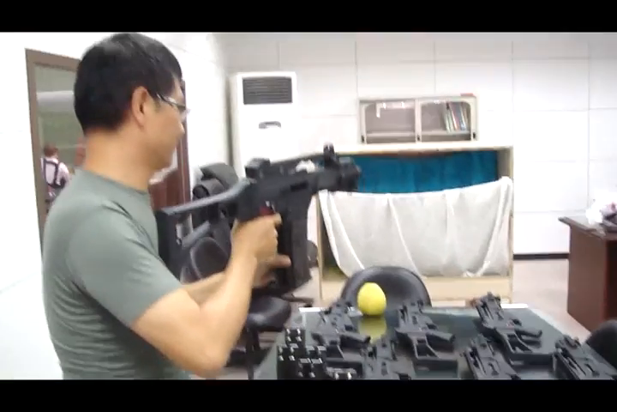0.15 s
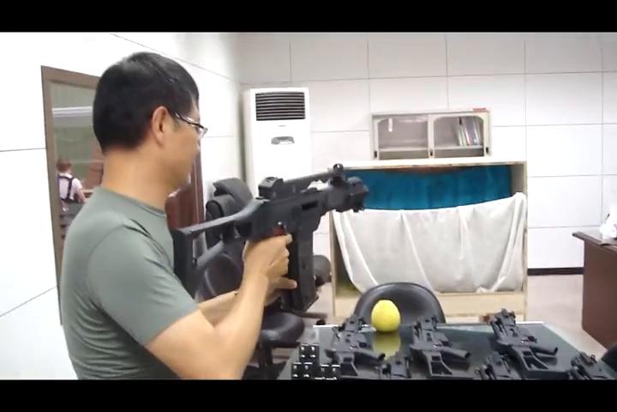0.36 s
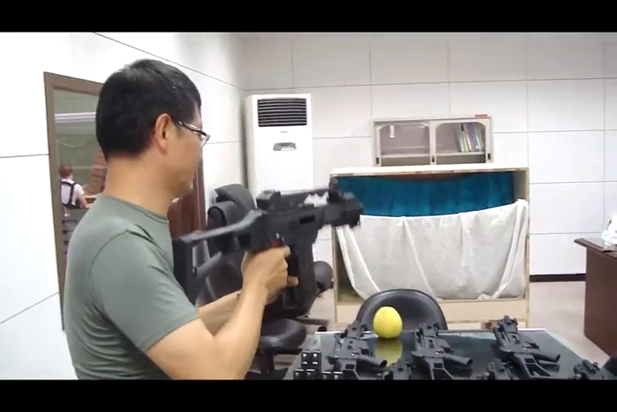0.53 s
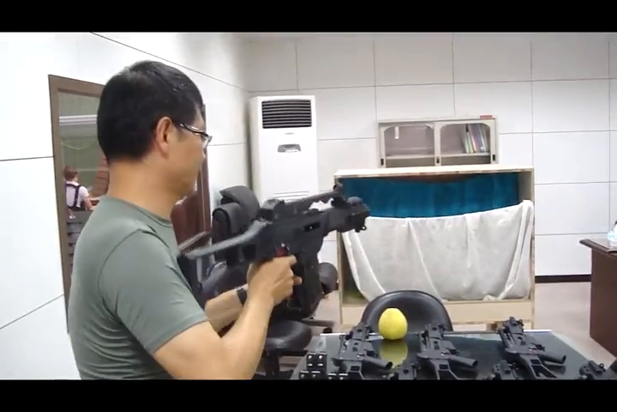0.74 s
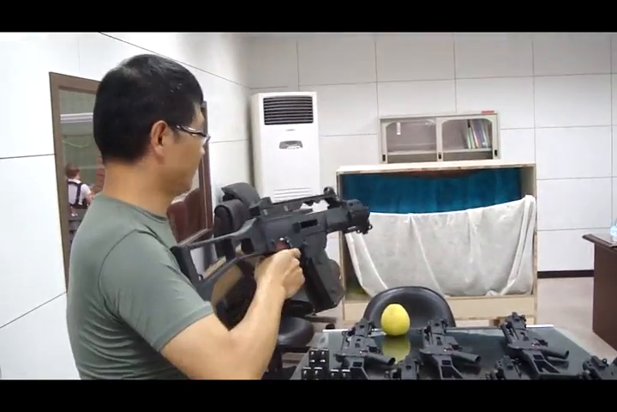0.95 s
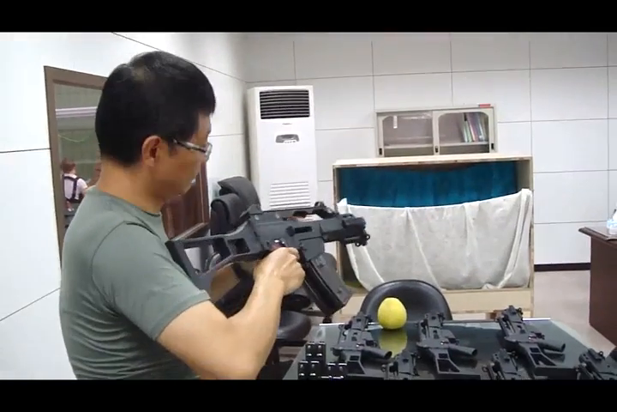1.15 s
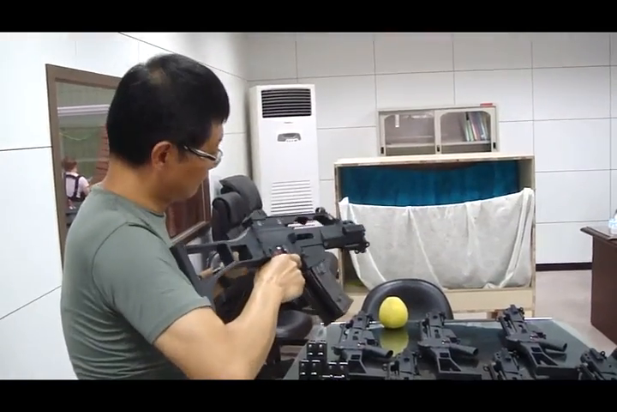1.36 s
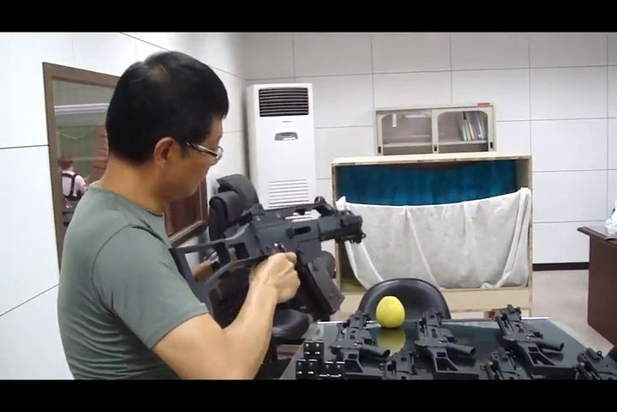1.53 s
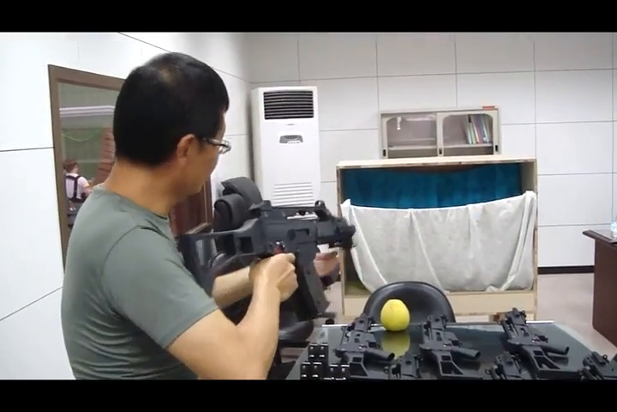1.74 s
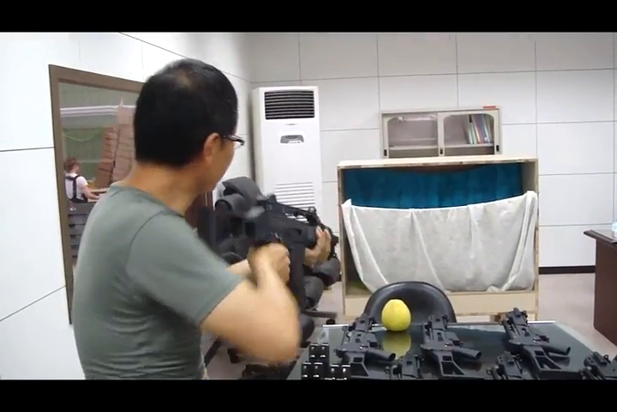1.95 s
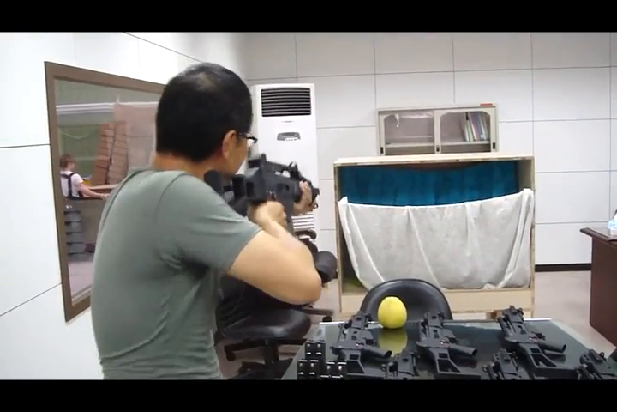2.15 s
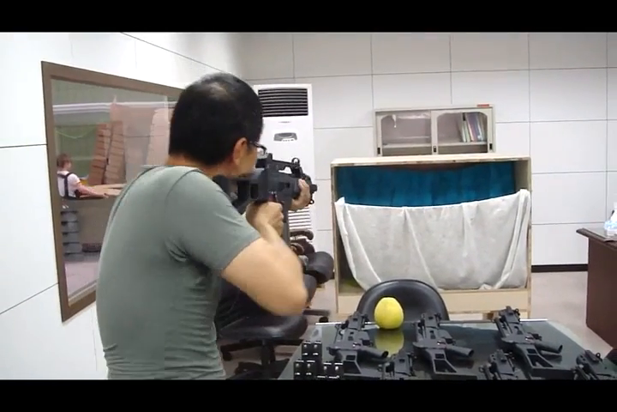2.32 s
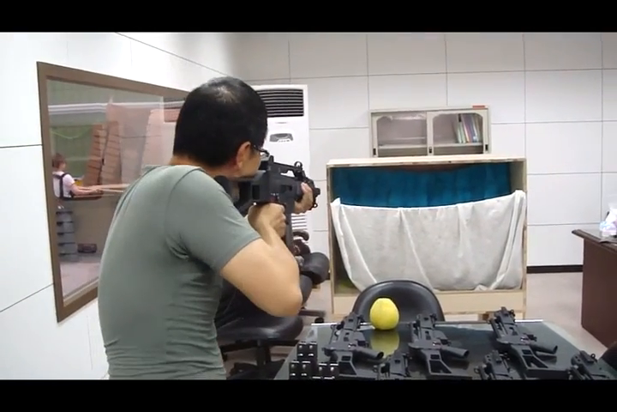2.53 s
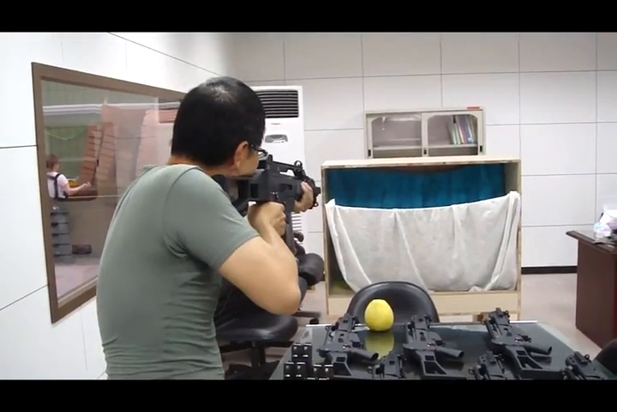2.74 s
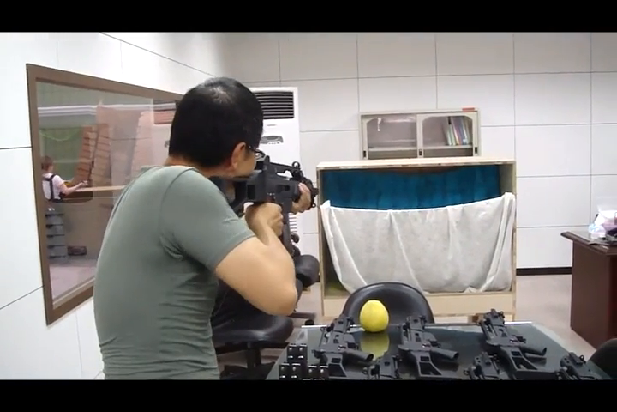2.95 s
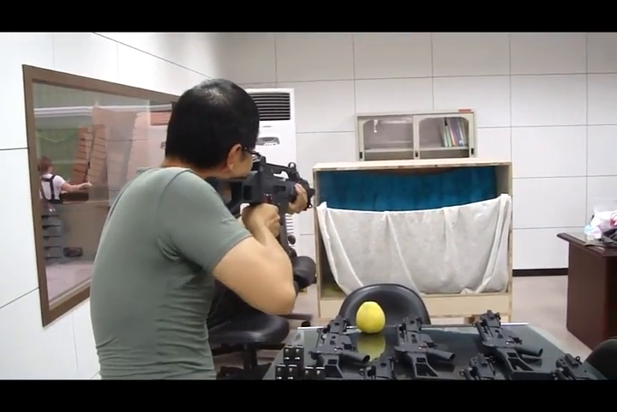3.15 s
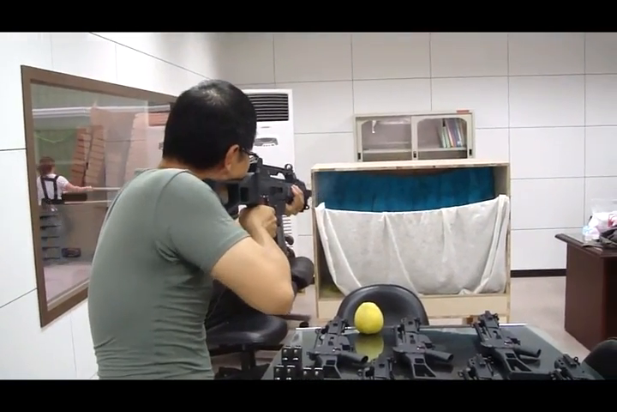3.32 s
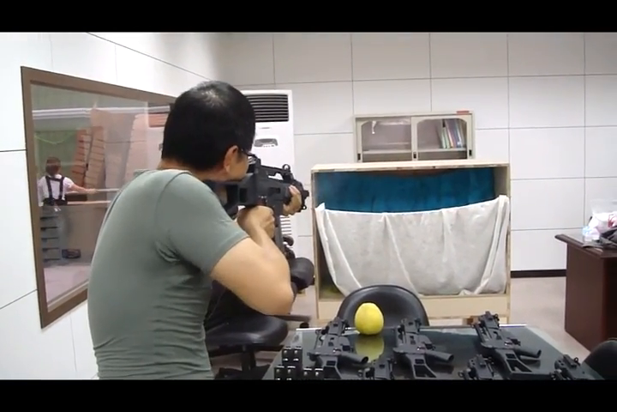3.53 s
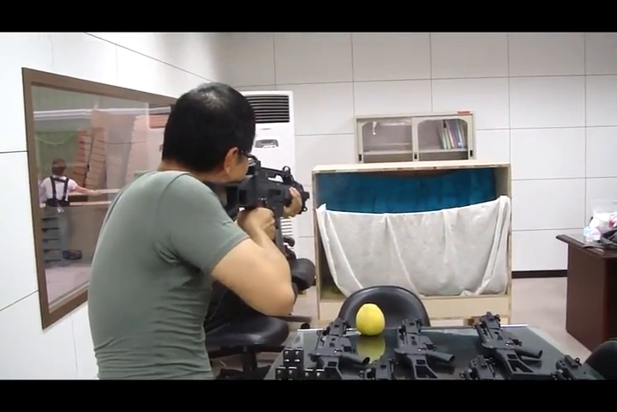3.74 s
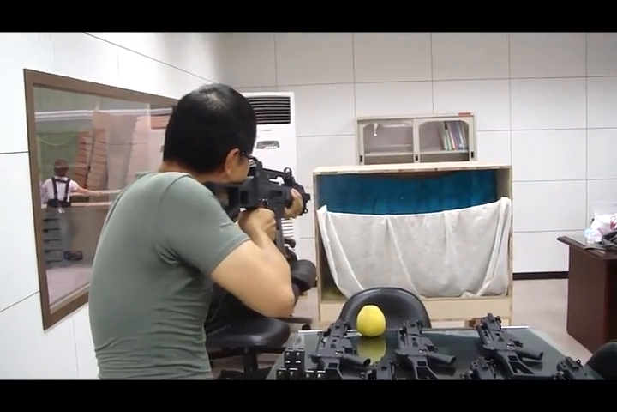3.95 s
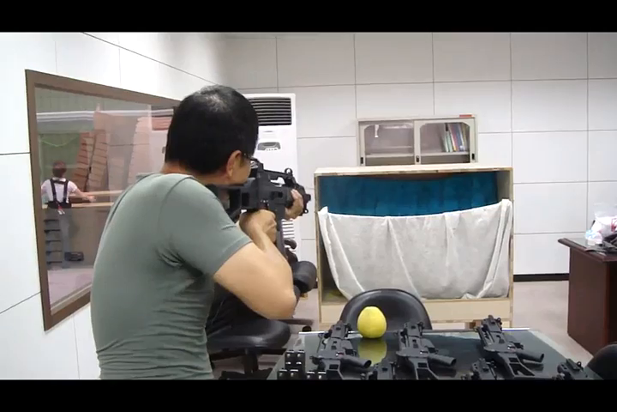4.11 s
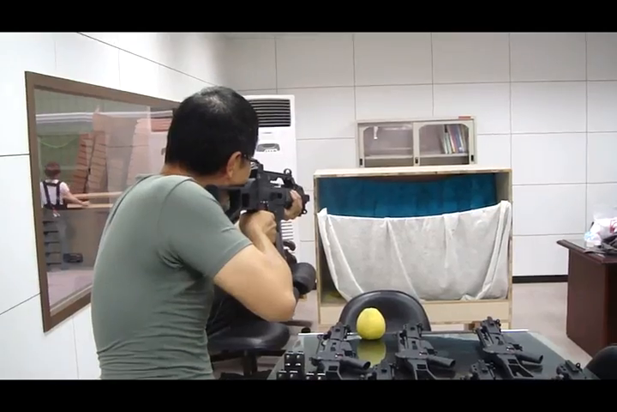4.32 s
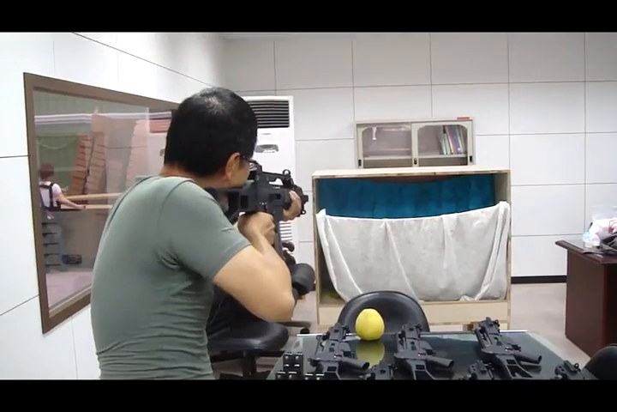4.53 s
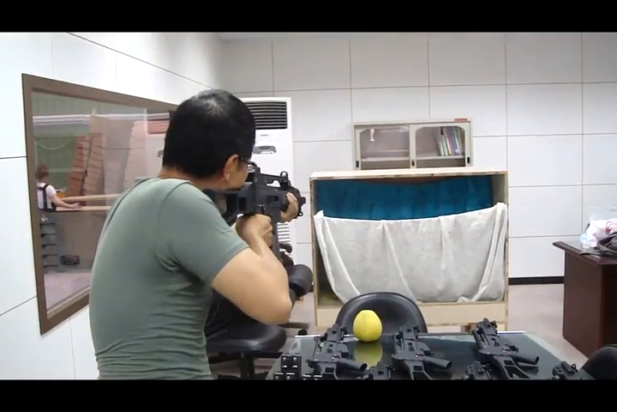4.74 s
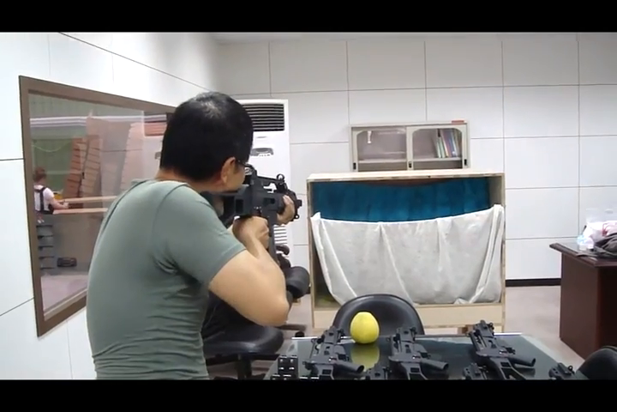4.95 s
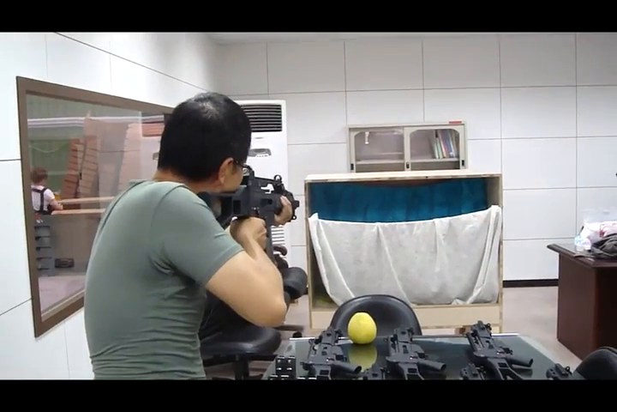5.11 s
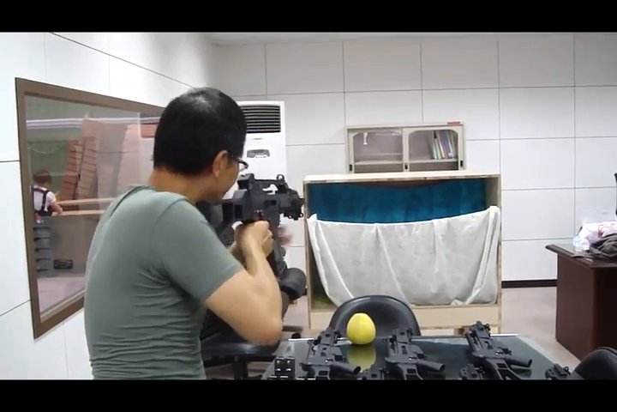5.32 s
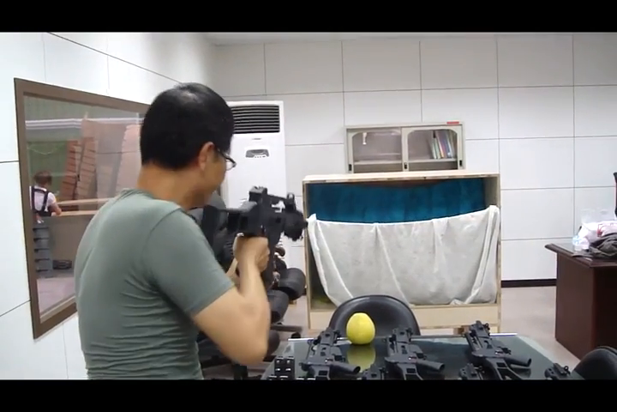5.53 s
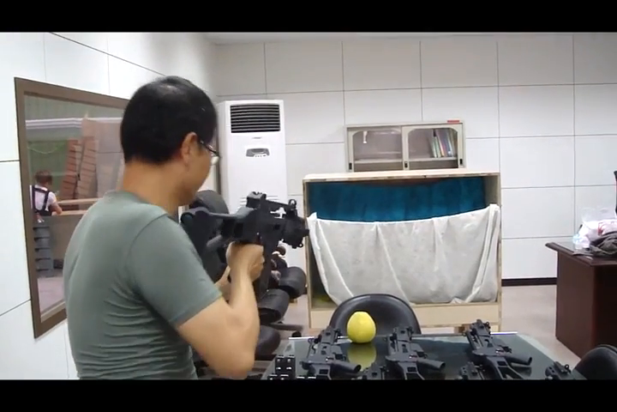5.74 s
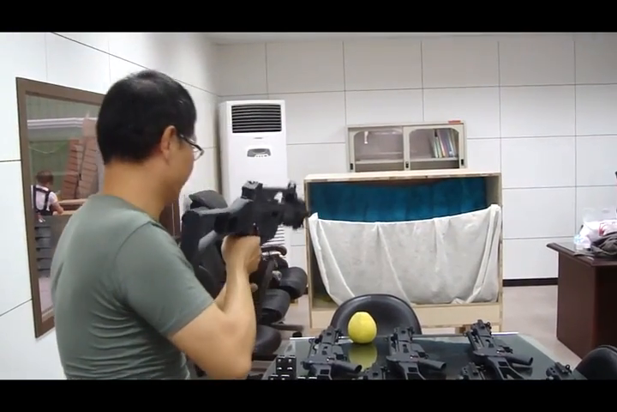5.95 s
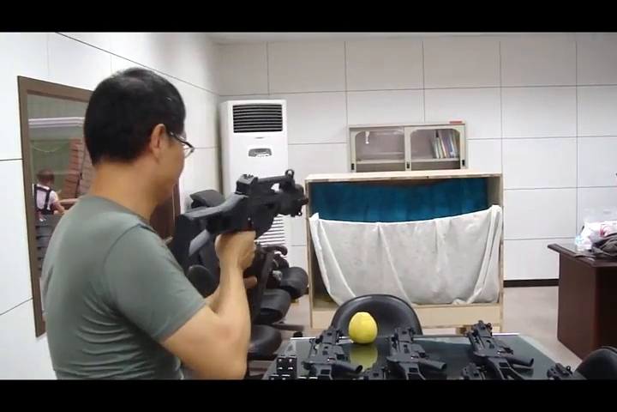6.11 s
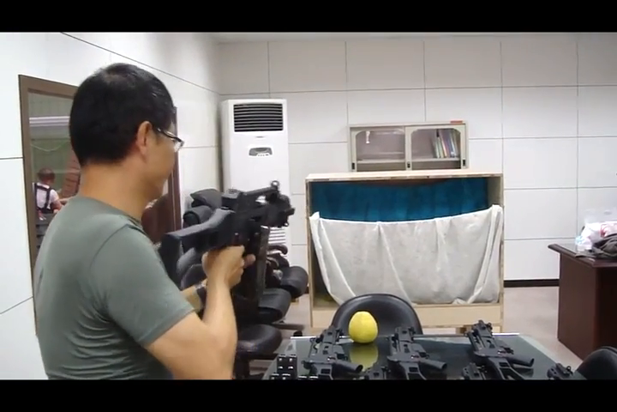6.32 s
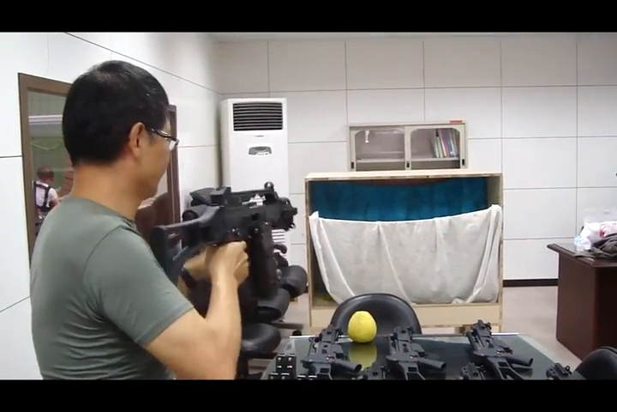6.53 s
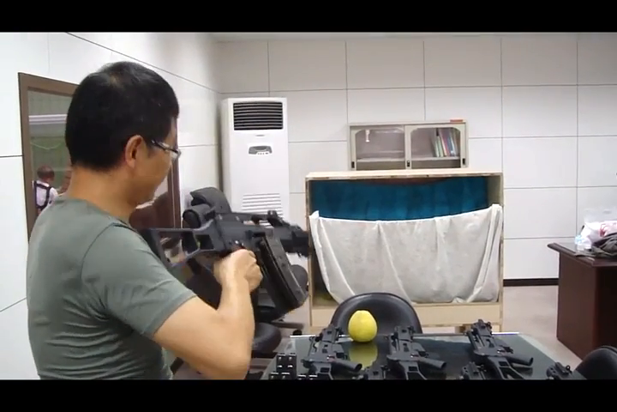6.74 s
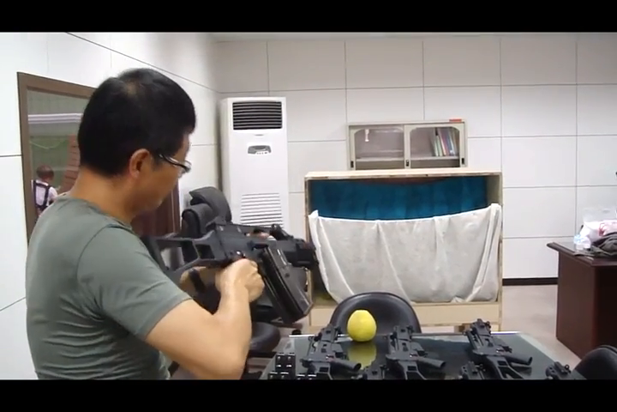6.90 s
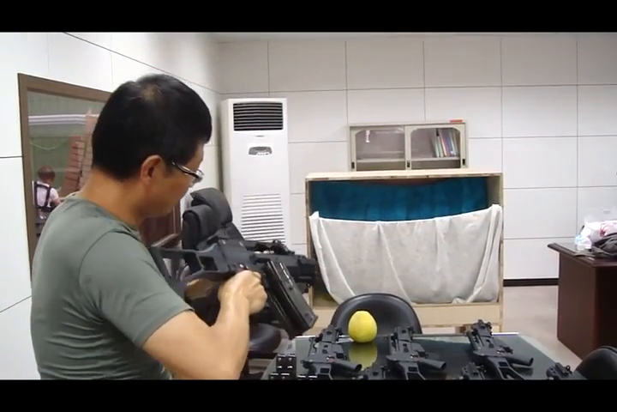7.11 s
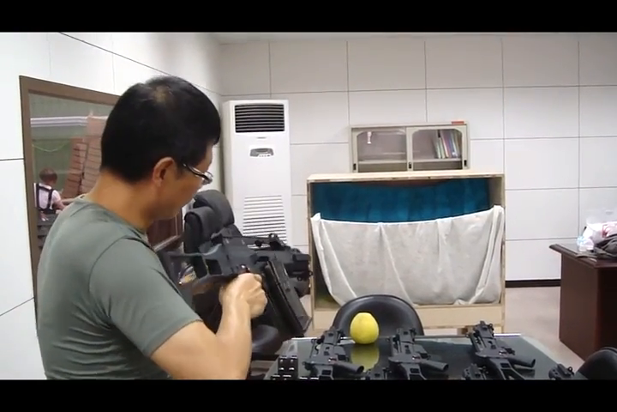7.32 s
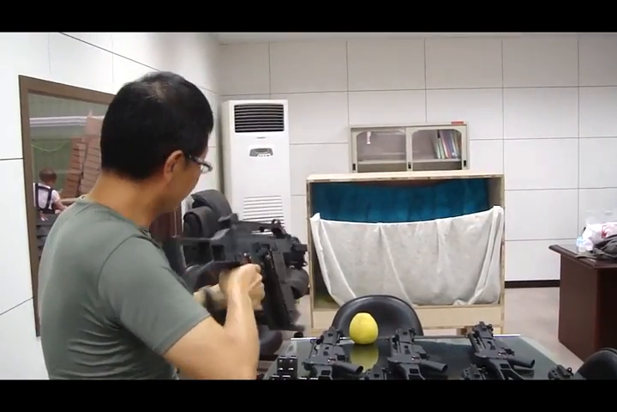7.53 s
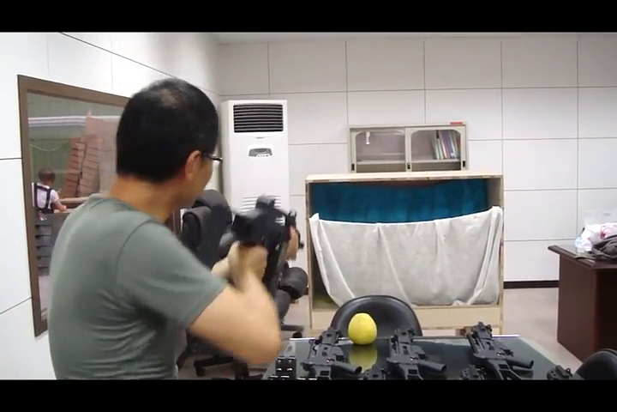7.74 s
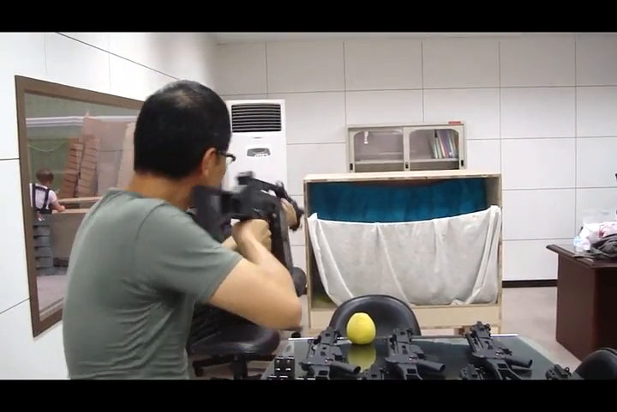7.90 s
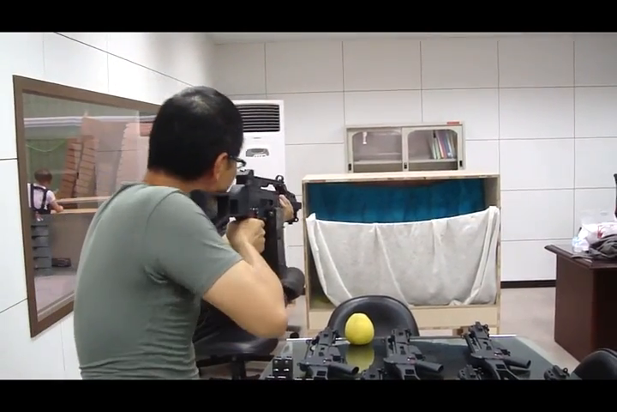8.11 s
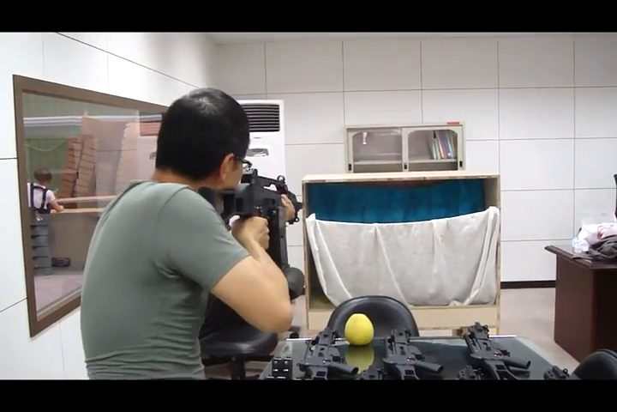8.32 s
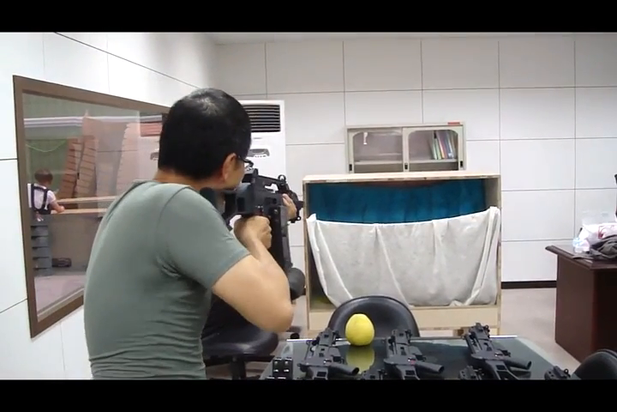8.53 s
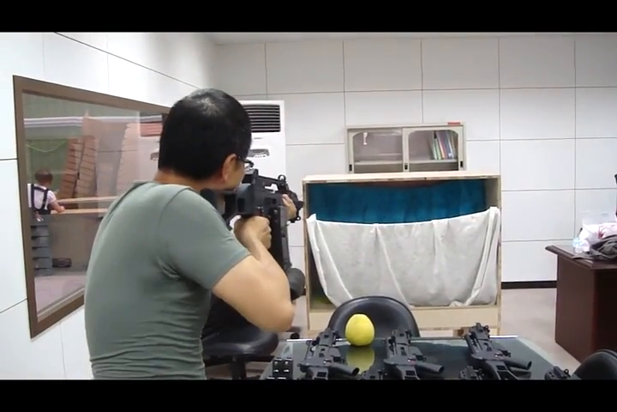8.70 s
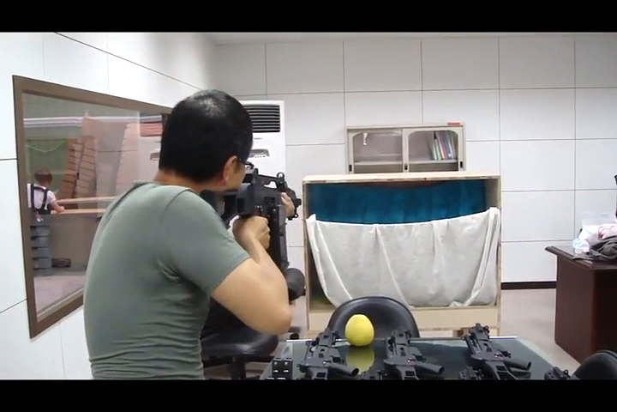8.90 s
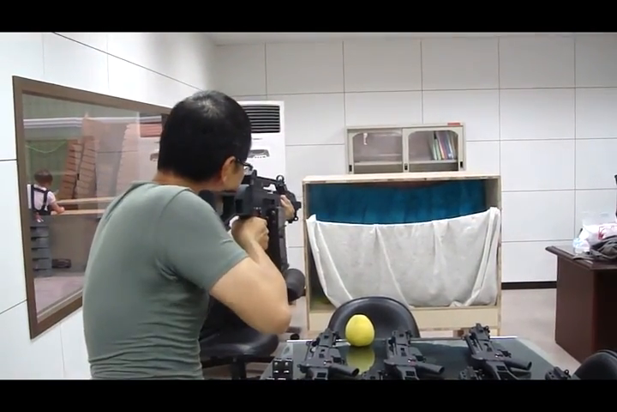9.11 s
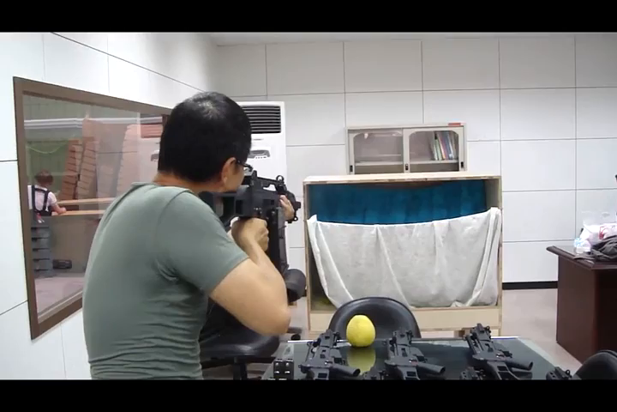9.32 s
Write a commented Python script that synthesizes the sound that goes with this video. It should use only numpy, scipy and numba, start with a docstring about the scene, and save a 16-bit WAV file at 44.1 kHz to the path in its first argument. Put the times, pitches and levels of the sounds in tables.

```python
"""A gas blowback airsoft rifle in a hard-walled room with a steady ventilation rush.
Hands bump the magazine and latch it, the bolt slams home, and a full-auto burst of gas pops and bolt
clacks follows, slowing and weakening as the gas cools. The magazine is latched again, the bolt slams
and a shorter burst fires at an even rate. Throughout, a gain control flattens every loud blow and
lets the room's ring swell up behind it."""
import sys
import numpy as np
from scipy import signal
from scipy.fft import rfft, irfft
from scipy.io import wavfile
from numba import njit

SR = 44100
rng = np.random.default_rng(int(sys.argv[2]) if len(sys.argv) > 2 else 0)


def transcribe(u):
    """Save the signal u as a 16-bit wav file named by the first command-line argument.

    u: samples, shape (n,) or (channels, n), limited to [-1, 1]; the rate is SR.
    q: integer samples, one column per channel.
    """
    v = np.clip(np.atleast_2d(u).T, -1, 1)
    q = np.round(v * 32767).astype(np.int16)
    wavfile.write(sys.argv[1], SR, q)


N = 412776


def amp(db):
    """Decibels to gain."""
    return 10 ** (np.asarray(db) / 20)


def unit_energy(x):
    """Scale so that the squares sum to one."""
    return x / np.sqrt(np.sum(x ** 2) + 1e-20)


def at_hz(points, hz):
    """Read a table on a log-frequency axis."""
    table_hz, values = np.transpose(points)
    return np.interp(np.log(np.maximum(hz, 1)), np.log(table_hz), values)


def convolve(x, response):
    """Play x through an impulse response."""
    return signal.fftconvolve(x, response)[:len(x)]


def colour(spectrum, size=8192):
    """Minimum-phase impulse response with the given spectrum."""
    gain = amp(at_hz(spectrum, np.fft.rfftfreq(size, 1 / SR)))
    cepstrum = irfft(np.log(gain))
    cepstrum[1:size // 2] *= 2
    cepstrum[size // 2 + 1:] = 0
    return irfft(np.exp(rfft(cepstrum)))


def body(spectrum, modes):
    """Impulse response of a part: a broad crack with resonances ringing out of it."""
    crack, rings = colour(spectrum), 0
    for hz, width_hz, db in modes:
        r = np.exp(-np.pi * width_hz / SR)
        poles = [1, -2 * r * np.cos(2 * np.pi * hz / SR), r * r]
        rings = rings + amp(db) * (1 - r * r) / 2 * signal.lfilter([1, 0, -1], poles, crack)
    return unit_energy(crack + rings)


def blows(rows, rise, size=8192):
    """Each contact or puff is a rough, broadband force; it swells over `rise` of its length, then dies."""
    force, t = np.zeros(N + 2 * size), np.arange(size) / SR
    for (s, db, length_s), grit in zip(rows, rng.standard_normal((len(rows), size))):
        decay, start = np.exp(-t / length_s), int(s * SR)
        swell = (1 - np.exp(-t / (rise * length_s))) ** 2
        whitened = irfft(np.exp(1j * np.angle(rfft(grit * decay * swell))))
        pulse = unit_energy(whitened * np.sqrt(swell * np.sqrt(decay)))
        force[start:start + size] += amp(db) * np.linalg.norm(decay) * pulse
    return force[:N]


def pattern(events, contacts):
    """Repeat a run of contacts at every event (s, force dB)."""
    return [(s + delay_s, force_db + db, length_s)
            for s, force_db in events for delay_s, db, length_s in contacts]


# Air spectrum. Each row: frequency in Hz, relative level in dB.
VENT_SPECTRUM = [(15, -65), (25, -27), (92, -21.5), (160, -7.5), (260, -5), (353, -1), (444, -9), (492, -5),
                 (559, -5), (703, -3), (884, -4.5), (1230, -8.5), (2100, -12), (3320, -21.5),
                 (11000, -37.5), (14300, -68), (22000, -120)]

def ventilation(rms_db=-36.5):
    """Steady rush of moving air."""
    return amp(rms_db) * convolve(rng.standard_normal(N), unit_energy(colour(VENT_SPECTRUM)))


# Spectra of the struck parts. Each row: frequency in Hz, relative level in dB.
RECEIVER_SPECTRUM = [(40, -27), (120, -29), (300, -14), (550, -8), (800, -0.5), (1300, 4), (2400, 3),
                     (4000, -4), (5300, -7), (8000, -17.5), (11000, -23.5)]
MAGAZINE_SPECTRUM = [(40, -27), (150, -36), (350, -16), (550, 1.5), (800, -0.5), (1150, 2.5), (1500, -5.5),
                     (2500, -7.5), (5000, -14.5), (11000, -30)]
CATCH_SPECTRUM = [(100, -17), (800, 0), (2000, 12.5), (4500, 11.5), (7000, 7), (11000, 0.5)]
BUFFER_SPECTRUM = [(60, -28), (300, -19), (700, -2), (1800, -0.5), (3000, -1), (4200, -1), (7000, -8.5),
                   (11000, -18.5)]
# Their resonances. Each row: frequency in Hz, width in Hz, gain in dB.
RECEIVER_MODES = [(580, 160, 2.5), (1064, 12, 9.5), (1175, 77, -2.5), (1590, 51, -13), (2260, 160, -16)]
MAGAZINE_MODES = [(1020, 120, 2), (1104, 38, 4.2), (1190, 57, 3.7)]
CATCH_MODES = [(1990, 35, 8), (3623, 120, 3), (4155, 79, 8.5), (4210, 74, 6.5), (5740, 60, -5)]
BUFFER_MODES = [(2950, 510, 0.9), (3290, 35, 1.3)]
# Handling bumps. Each row: start in seconds, receiver in dB, magazine in dB, length in seconds.
BUMPS = [(.370, -21, -24, 0.0068), (0.503, -25, -26, 0.0047), (0.521, -20.5, -19, 0.0048),
         (0.555, -15, -24, 0.0056), (0.563, -12, -17, 0.0056), (1.358, -19, -8.5, 0.0034),
         (5.421, -21.5, -22, 0.0081), (5.822, -20.5, -24, 0.012), (5.882, -37, -22.5, 0.0085),
         (6.21, -12, -4, 0.0067), (6.222, -1, -3, 0.0056), (6.695, -27, -31, .006),
         (7.139, -29, -20, 0.0063)]
# Catch clicks and pushes that seat the magazine. Each row: time in seconds, force in dB.
CLICKS = [(0.368, -25), (1.227, -23), (1.269, -11), (1.339, -20.5), (7.041, -18.5), (7.062, -11.5),
          (7.111, -14.5)]
SEATINGS = [(.590, -1), (6.302, 2)]
# The magazine meets the catch, then its stop.
# Each row: offset from the stop in seconds, relative level in dB, length in seconds.
SEAT_RECEIVER = [(-.009, -2.5, 0.0016), (0, 7.5, 0.0036)]
SEAT_MAGAZINE = [(-.009, -14, 0.0069), (0, 2, 0.0017)]
SEAT_BUFFER = [(0.0014, -6.5, 0.0029)]

def magazine_handling(click_s=0.0031):
    """Hands knock the receiver, steel catches click, and the hollow magazine clunks home."""
    knocks = [(s, db, length_s) for s, db, _, length_s in BUMPS] + pattern(SEATINGS, SEAT_RECEIVER)
    clunks = [(s, db, length_s) for s, _, db, length_s in BUMPS] + pattern(SEATINGS, SEAT_MAGAZINE)
    clicks = [(s, db, click_s) for s, db in CLICKS]
    jolts = pattern(SEATINGS, SEAT_BUFFER)
    return (convolve(blows(knocks, rise=0.66), body(RECEIVER_SPECTRUM, RECEIVER_MODES))
            + convolve(blows(clunks, rise=0.83), body(MAGAZINE_SPECTRUM, MAGAZINE_MODES))
            + convolve(blows(clicks, rise=0.38), body(CATCH_SPECTRUM, CATCH_MODES))
            + convolve(blows(jolts, rise=0.68), body(BUFFER_SPECTRUM, BUFFER_MODES)))


# Bolt releases. Each row: slam time in seconds, slam force in dB, run-up force in dB.
RELEASES = [(1.648, -0.5, -12.5), (7.478, -0.5, -3)]
# Run-up and slam contacts.
# Each row: offset from the slam in seconds, relative level in dB, length in seconds.
RUN_MAGAZINE = [(-.024, -7.5, 0.004), (-.013, -1.5, 0.007)]
RUN_STEEL = [(-.019, -18, 0.0095), (-.012, -1, .0016)]
RUN_BUFFER = [(-0.0086, -2.4, .003)]
SLAM_STEEL = [(0.00098, 1.8, 0.00073)]
SLAM_RECEIVER = [(0.0013, 1.3, 0.003)]
SLAM_MAGAZINE = [(0.0016, 7.5, 0.0028)]
SLAM_BUFFER = [(0.00075, 14.6, 0.0022)]

def bolt_release(catch_lead_s=0.040, catch_db=-27, catch_s=0.01):
    """The catch lets go, the bolt runs forward over the magazine and its slam shakes the whole rifle."""
    slams = [(s, db) for s, db, _ in RELEASES]
    run_ups = [(s, db) for s, _, db in RELEASES]
    unlatch = [(s - catch_lead_s, catch_db, catch_s) for s, _ in slams]
    steel = unlatch + pattern(run_ups, RUN_STEEL) + pattern(slams, SLAM_STEEL)
    knocks = pattern(slams, SLAM_RECEIVER)
    clunks = pattern(run_ups, RUN_MAGAZINE) + pattern(slams, SLAM_MAGAZINE)
    jolts = pattern(run_ups, RUN_BUFFER) + pattern(slams, SLAM_BUFFER)
    return (convolve(blows(steel, rise=0.19), body(CATCH_SPECTRUM, CATCH_MODES))
            + convolve(blows(knocks, rise=0.49), body(RECEIVER_SPECTRUM, RECEIVER_MODES))
            + convolve(blows(clunks, rise=0.71), body(MAGAZINE_SPECTRUM, MAGAZINE_MODES))
            + convolve(blows(jolts, rise=0.8), body(BUFFER_SPECTRUM, BUFFER_MODES)))


# Trigger pulls. Each row: opening pop time in seconds, hammer in dB, pop in dB, bolt in dB.
TRIGGER_PULLS = [(2.761, -20, 11, 1), (8.391, -16, 6, 0)]
# Bolt on buffer. Each row: delay after the pop in seconds, relative level in dB, length in seconds.
OPENING_KICK = [(.006, 19, .0011), (0.017, 14.5, 0.0042)]

def trigger_pulls(hammer_lead_s=0.0073, hammer_s=0.0068):
    """The hammer snaps, and the first puff of gas kicks the bolt from rest into the buffer."""
    hammer = [(s - hammer_lead_s, db, hammer_s) for s, db, _, _ in TRIGGER_PULLS]
    kicks = pattern([(s, db) for s, _, _, db in TRIGGER_PULLS], OPENING_KICK)
    return (convolve(blows(hammer, rise=0.33), body(CATCH_SPECTRUM, CATCH_MODES))
            + convolve(blows(kicks, rise=0.73), body(BUFFER_SPECTRUM, BUFFER_MODES)))


# Firing cycle. Each row: shot number, cycle length in seconds.
FIRST_CYCLE_S = [(0, .05942), (4, .06028), (9, .06504), (14, .07397), (19, .07988), (27, .09427)]

def first_burst(start_s=2.8142, shots=29):
    """Clack times in seconds; the cycle lengthens as the gas cools."""
    cycles_s = np.interp(np.arange(shots - 1), *np.transpose(FIRST_CYCLE_S))
    return start_s + np.r_[0, np.cumsum(cycles_s)]


# Gas pressure. Each row: time in seconds, force in dB.
PRESSURE_DB = [(2.76, 2.5), (3.5, 2), (4.3, -1), (4.9, -3.5)]

def pressure_db(times_s):
    """Force of the gas, falling through the first burst."""
    return np.interp(times_s, *np.transpose(PRESSURE_DB))


def second_burst(start_s=8.491, cycle_s=0.08, shots=12):
    """Evenly spaced shots of equal force: (s, force dB)."""
    return [(start_s + cycle_s * k, 0) for k in range(shots)]


# Pop spectrum. Each row: frequency in Hz, relative level in dB.
GAS_SPECTRUM = [(40, -36), (100, -20.5), (165, -11.5), (270, -7.5), (420, -3.5), (600, 1.5), (1200, 3),
                (1700, -1.5), (3000, 2.5), (5000, -2), (7500, -5.5), (11000, -14)]
# Pop resonances. Each row: frequency in Hz, width in Hz, gain in dB.
GAS_MODES = [(710, 170, -2.5), (1175, 120, -8)]
# Puffs per cycle, by burst.
# Each row: offset from the clack in seconds, relative level in dB, length in seconds.
FIRST_PUFFS = [(-.026, 2, 0.0092), (-.012, 8, 0.0078)]
SECOND_PUFFS = [(-.029, 19.5, 0.0053)]

def gas_pops(opening_pop_s=0.0067):
    """Gas puffs from the muzzle at each shot, weakening in the first burst as the magazine cools."""
    opening = [(s, db, opening_pop_s) for s, _, db, _ in TRIGGER_PULLS]
    cooling = zip(first_burst(), pressure_db(first_burst()))
    puffs = opening + pattern(cooling, FIRST_PUFFS) + pattern(second_burst(), SECOND_PUFFS)
    return convolve(blows(puffs, rise=0.46), body(GAS_SPECTRUM, GAS_MODES))


# Bolt and carrier spectra. Each row: frequency in Hz, relative level in dB.
BOLT_SPECTRUM = [(60, -41), (150, -41), (300, -20), (800, -6.5), (2000, 0.5), (3200, 2.5), (5000, -1),
                 (7000, -8), (11000, -12.5)]
CARRIER_SPECTRUM = [(60, -53), (300, -36), (800, -1), (2000, 6.5), (3600, 1), (5000, 1), (6500, 0.5),
                    (11000, -13.5)]
# Their resonances. Each row: frequency in Hz, width in Hz, gain in dB.
BOLT_MODES = [(3397, 71, 3), (4770, 450, -16)]
CARRIER_MODES = [(3780, 220, -9), (4440, 370, 4.5), (4860, 130, 4)]
# Contacts per cycle, by burst.
# Each row: offset from the clack in seconds, relative level in dB, length in seconds.
FIRST_CLACKS = [(0, 20, 0.00086), (.0018, 15.5, 0.0011), (.023, 8.3, .003)]
FIRST_REBOUNDS = [(.0008, 19.6, 0.0013), (.011, 15, 0.0022), (.029, 8, 0.0032)]
SECOND_CLACKS = [(-.0275, 25.6, 0.0024), (-.0008, 29, 0.00083)]
SECOND_RECOILS = [(-.041, 16.6, 0.0072), (-.030, 17, 0.0039), (-.006, 20, 0.0055), (-.0005, 24.4, 0.003)]

def blowback(clack_db=-1.2, scatter_db=0.8, pressure_share=0.45, rebound_swing_db=2.9):
    """The bolt clacks each cycle; it rebounds in the first burst and hits the buffer in the second."""
    times_s = first_burst()
    drive_db = pressure_share * pressure_db(times_s)
    force_db = clack_db + drive_db + scatter_db * rng.standard_normal(len(times_s))
    clacks = pattern(zip(times_s, force_db), FIRST_CLACKS) + pattern(second_burst(), SECOND_CLACKS)
    # with less gas to cushion it, the carrier rebounds more freely
    rebound_db = drive_db + rebound_swing_db * np.linspace(-1, 1, len(times_s))
    rebounds = pattern(zip(times_s, rebound_db), FIRST_REBOUNDS)
    recoils = pattern(second_burst(), SECOND_RECOILS)
    return (convolve(blows(clacks, rise=0.37), body(BOLT_SPECTRUM, BOLT_MODES))
            + convolve(blows(rebounds, rise=0.32), body(CARRIER_SPECTRUM, CARRIER_MODES))
            + convolve(blows(recoils, rise=0.12), body(BUFFER_SPECTRUM, BUFFER_MODES)))


# Room decay. Each row: frequency in Hz, time to fall 60 dB in seconds.
ROOM_T60_S = [(150, 0.28), (400, 0.88), (1000, 0.89), (2800, 0.87), (5500, 0.6969), (11000, 0.75)]

def room(build_s=0.0034, size=52000):
    """Diffuse ring of the room: it builds up, then each band dies at its own rate."""
    t, tail = np.arange(size) / SR, 0
    edges_hz = np.geomspace(40, 16000, 19)
    for low, high in zip(edges_hz, edges_hz[1:]):
        bandpass = signal.butter(2, [low, high], "band", fs=SR, output="sos")
        band = signal.sosfilt(bandpass, rng.standard_normal(size))
        decay = np.exp(-np.log(1000) * t / at_hz(ROOM_T60_S, np.sqrt(low * high)))
        shape = decay * (1 - np.exp(-t / build_s))
        tail = tail + unit_energy(band * shape) * np.linalg.norm(shape) * np.sqrt(high - low)
    return unit_energy(tail)


def reverberate(x, sway_hz=1.3):
    """The rifle sways in the hands, so its sound slides between two rings of the room."""
    angle = 2 * np.pi * sway_hz * np.arange(N) / SR
    return convolve(x * np.cos(angle), room()) + convolve(x * np.sin(angle), room())


# Strongest reflections. Each row: delay in seconds, gain in dB.
REFLECTIONS = [(.0052, -18), (0.0219, -31)]

def reflections(x):
    """Single bounces off the nearest hard surfaces."""
    return sum(amp(db) * np.pad(x, (round(delay_s * SR), 0))[:N] for delay_s, db in REFLECTIONS)


def scene(handling_room_db=-5.5, slam_room_db=-4, bolt_room_db=-4.5, gas_room_db=5.0):
    """Rifle, room and ventilation; the muzzle points away, so the pops are the wettest."""
    hands, slams = magazine_handling(), bolt_release() + trigger_pulls()
    bolt, gas = blowback(), gas_pops()
    ring = (reverberate(amp(handling_room_db) * hands + amp(slam_room_db) * slams)
            + amp(bolt_room_db) * reverberate(bolt)
            + amp(gas_room_db) * reverberate(gas))
    return (hands + slams + bolt + gas + reflections(bolt) + ring + ventilation())[None]


@njit
def follow(x, attack_s, release_s):
    """Envelope that rises and falls with separate time constants."""
    out, level = np.empty_like(x), 0.0
    for i in range(len(x)):
        level += (x[i] - level) / (1 + SR * (attack_s if x[i] > level else release_s))
        out[i] = level
    return out


def gain_control(x, threshold_db=-17.0, slope=0.96, ahead_s=0.00267, hold_share=0.63):
    """A fast limiter; after long loud passages a slow stage keeps the gain down for a while."""
    t = np.arange(N) / SR
    level = follow(np.abs(x), attack_s=0.0046, release_s=0.016)
    ahead_db = 20 * np.log10(np.interp(t + ahead_s, t, level) + 1e-9)
    cut_db = slope * np.maximum(ahead_db - threshold_db, 0)
    held_db = hold_share * follow(cut_db, attack_s=0.46, release_s=0.98)
    return x * amp(-np.maximum(cut_db, held_db))


# Level dips. Each row: delay after the clack in seconds, depth in dB at the first shot, at the last.
LULLS = [(0.017, 2, 0), (.053, 1, 5)]

def lulls(width_s=0.007):
    """Gain that dips twice a cycle in the first burst; the early dip fades, the late one deepens."""
    t, clacks_s = np.arange(0, N, 64) / SR, first_burst()
    sag_db = sum(depth_db * np.exp(-((t - s - delay_s) / width_s) ** 2)
                 for delay_s, first_db, last_db in LULLS
                 for s, depth_db in zip(clacks_s, np.linspace(first_db, last_db, len(clacks_s))))
    return amp(-np.interp(np.arange(N) / SR, t, sag_db))


# Dull top: the treble drops away above 11 kHz. Each row: frequency in Hz, gain in dB.
DULL_TOP_DB = [(20, 0), (10900, 0), (11400, -18), (14000, -18), (15500, -38)]

def record(dry, ceiling=1.1, stopband_hz=15500):
    """Gain control, brief lulls, rounded peaks, a dull top and a steep low-pass."""
    levelled = gain_control(dry[0]) * lulls()
    rounded = ceiling * np.tanh(levelled / ceiling)
    dull = convolve(rounded, colour(DULL_TOP_DB))
    lowpass = signal.cheby2(12, 70, stopband_hz, fs=SR, output="sos")
    return signal.sosfilt(lowpass, dull)[None]


dry = scene()
out = record(dry)
transcribe(out)
```